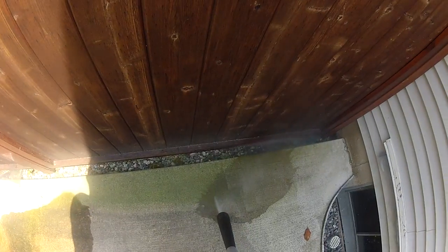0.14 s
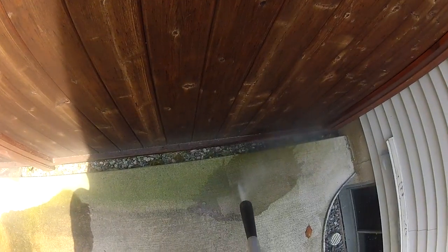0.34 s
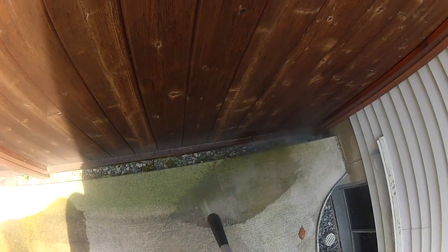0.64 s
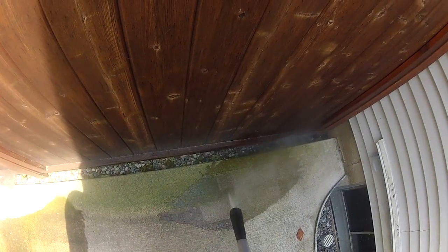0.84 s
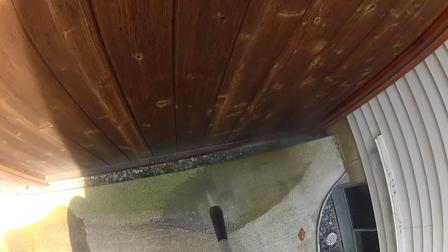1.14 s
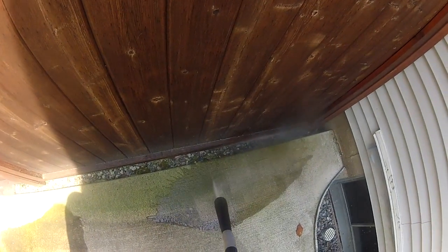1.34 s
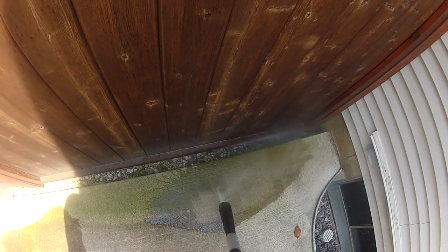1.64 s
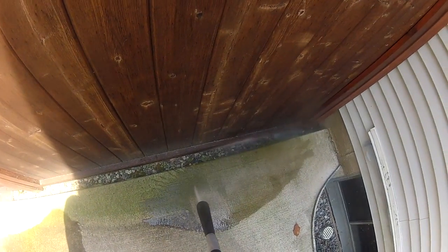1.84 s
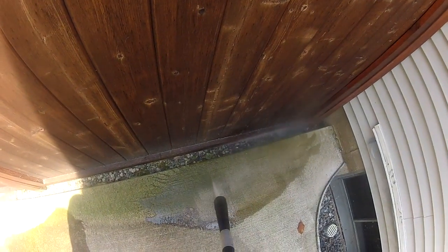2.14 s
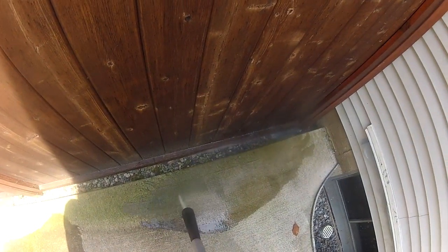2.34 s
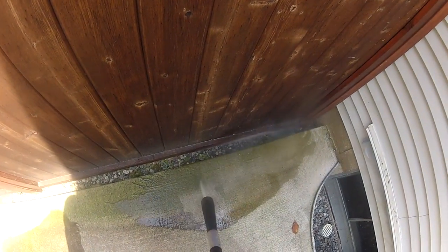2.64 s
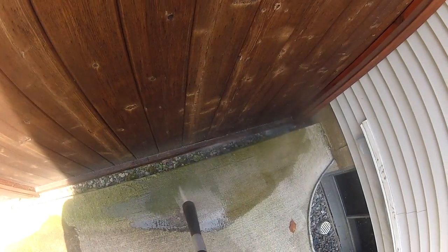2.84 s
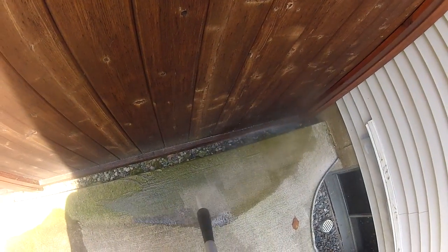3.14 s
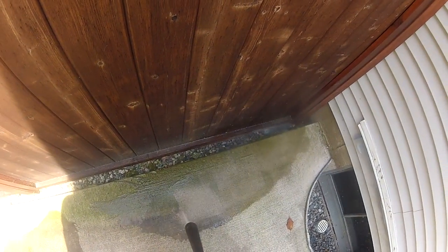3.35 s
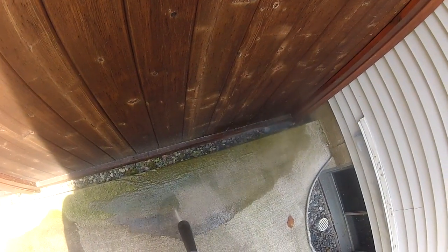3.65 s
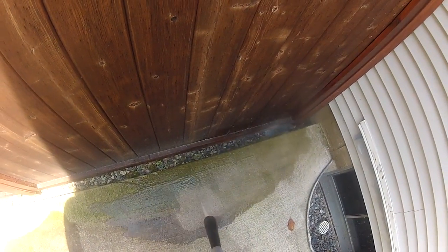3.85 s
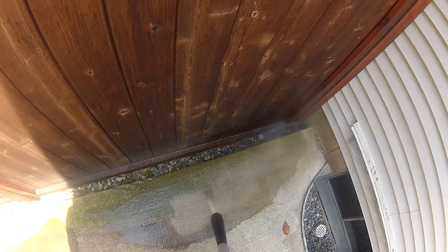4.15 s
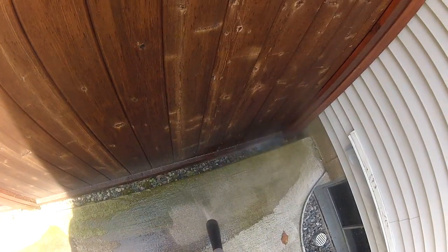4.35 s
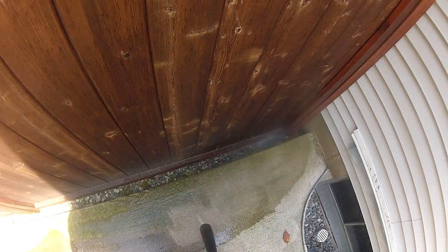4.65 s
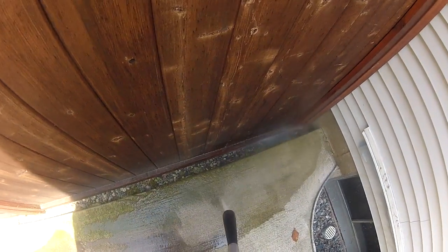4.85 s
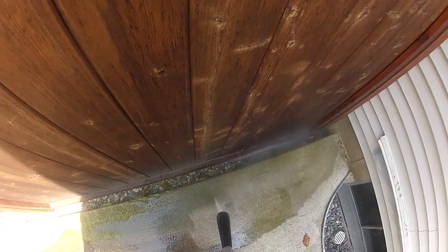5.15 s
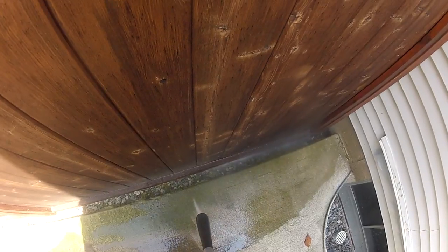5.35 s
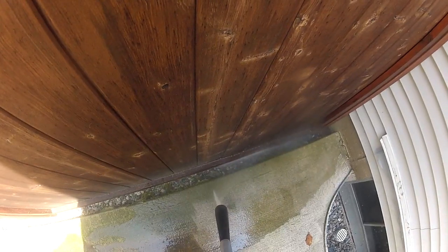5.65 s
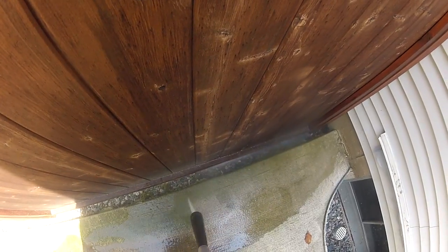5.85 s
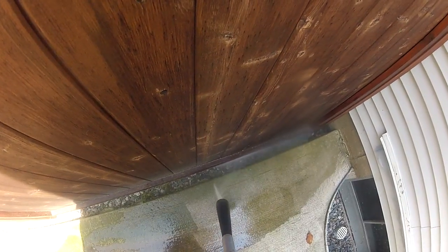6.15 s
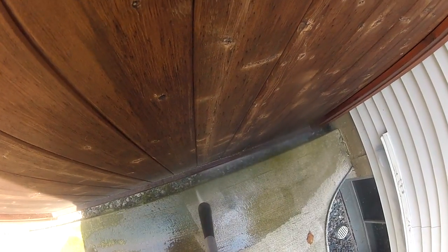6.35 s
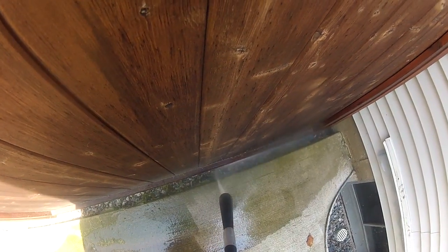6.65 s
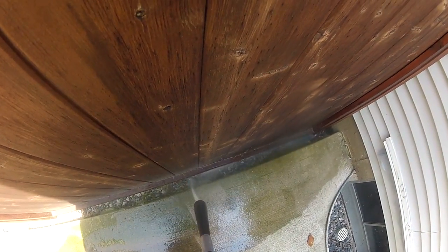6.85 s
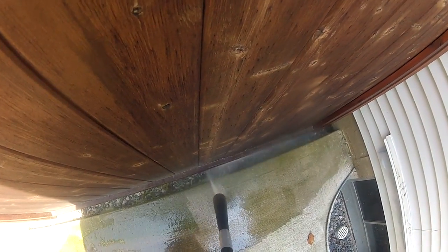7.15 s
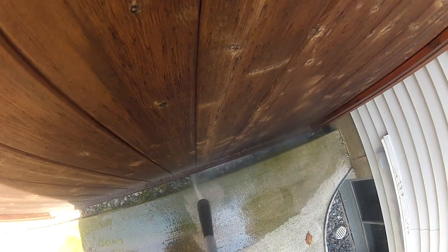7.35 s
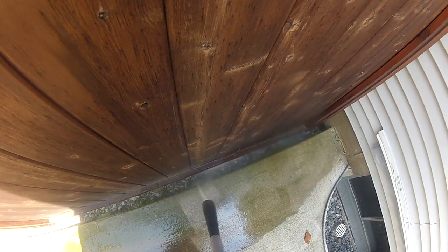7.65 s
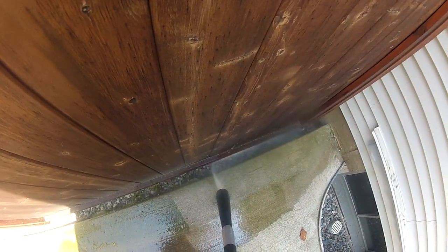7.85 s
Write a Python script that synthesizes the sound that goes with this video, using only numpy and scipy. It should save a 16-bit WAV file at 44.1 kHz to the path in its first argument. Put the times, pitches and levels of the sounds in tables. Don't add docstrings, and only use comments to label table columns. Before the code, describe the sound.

From 0 to 8 seconds a pressure washer jet hisses without pause on concrete, close and bright, with a fine flutter and a faint fast pulse from the pump. Beneath it a one-cylinder engine fires steadily, roughly 27 times a second, as a low blurred putter with rumble and airy exhaust roar, hidden behind a wooden fence. Near 1 second the hiss changes tint slightly as the wearer stands; at about 1.4 a tiny dip passes. Around 3.3 they stoop and the tint shifts again. At 4.1 to 4.5 the tail pipe buzz swells, then a short deeper dip comes at 4.6. From about 5 seconds the engine is in clear view, raspier and more tonal, while its lowest thump softens after 6 and the hiss eases slightly. Close reflections give a hollow, sliding colour; the body-worn microphone sounds coarse, with a gritty, metallic top. It ends still running.

```python
import sys
import numpy as np
from scipy import signal
from scipy.fft import rfft, irfft
from scipy.io import wavfile
from scipy.ndimage import uniform_filter1d, map_coordinates

SR = 44100
rng = np.random.default_rng(int(sys.argv[2]) if len(sys.argv) > 2 else 0)


def to_linear_factor(level_db):
    exponent = np.asarray(level_db, float) / 20
    return 10 ** exponent


def pcm_store(signal):
    levels = np.round(np.clip(np.atleast_2d(signal), -1, 1) * 32767)
    wavfile.write(sys.argv[1], SR, levels.astype(np.int16).T)


N = 352800


def unit(x):
    return x / np.sqrt(np.mean(np.abs(x) ** 2) + 1e-20)


def curves(rows):
    times, *columns = np.transpose(rows)
    return [np.interp(np.arange(N) / SR, times, column) for column in columns]


def wobble(rate):
    knots = rng.standard_normal(int(N * rate / SR) + 4)
    return map_coordinates(knots, [np.arange(N) * rate / SR])


def rush(colour, patchy_db):
    spectrum = signal.stft(rng.standard_normal(N + 1024), nperseg=1024)[2]
    ridges = uniform_filter1d(rng.standard_normal(spectrum.shape), size=3, axis=0)
    drifting = unit(uniform_filter1d(ridges, size=30, axis=1))
    patchy = signal.istft(spectrum * to_linear_factor(patchy_db * drifting), nperseg=1024)[1][:N]
    hz, db = np.transpose(colour)
    log_hz = np.log(np.fft.rfftfreq(N, 1 / SR) + 1)
    gain = to_linear_factor(np.interp(log_hz, np.log(hz), db))
    return unit(irfft(rfft(patchy) * gain, N))


def later(x, ms):
    return map_coordinates(x, [np.arange(N) - ms * SR / 1000], mode="mirror")


def pulses(orders, cycles, clear, unsteady_db, skew=0, glide=0):
    total, power = 0, 0
    for multiple, db, change_db in orders:
        level_db = db + clear * change_db
        phase = skew + glide * (multiple - orders[1][0]) ** 2
        total = total + to_linear_factor(level_db) * np.cos(2 * np.pi * multiple * cycles + phase)
        power = power + to_linear_factor(2 * level_db) / 2
    return total / np.sqrt(power) * to_linear_factor(unsteady_db * wobble(20))


# t/s, firings ahead of the steady rate [cycles]
GOVERNOR = [(0, 0), (1.1, .066), (1.55, .037), (2.85, -.02), (3.5, .033), (4.1, -.017), (4.7, -.008),
            (5.3, -.027), (6.2, .021), (6.6, .022), (6.9, .011), (8, .014)]


def firings():
    firing_hz, first = 27.26, -.401
    ahead, = curves(GOVERNOR)
    return first + firing_hz * np.arange(N) / SR + ahead


# t/s, stance [0 upright, 1 stooped, 2 turning, 3 past the corner, 4 settled]
STANCE = [(0, 1), (.85, 1.06), (1.1, 0), (3.15, 0), (3.35, 1), (4.66, 1.13), (4.93, 2), (5.12, 2.5),
          (5.35, 3), (6.05, 3), (6.65, 4.5), (8, 4)]


def by_stance(values):
    stance, = curves(STANCE)
    return np.interp(stance, np.arange(len(values)), values)


# t/s, thump level/dB, way along the fence [0-1], turn towards the tail pipe [0 none, 1
WALK = [(0, -16.4, .02, .75), (.5, -17, .02, .45), (1.3, -17.1, .18, 0), (1.85, -17.1, .24, 0),
        (2.05, -15.8, .28, 0), (3.25, -16.2, .36, 0), (3.7, -14.1, .33, .25), (4.11, -15.8, .5, .3),
        (4.18, -15.3, .55, 1.12), (4.5, -15.2, .62, 1.05), (4.62, -15, .76, .1), (4.88, -14.7, .84, -.2),
        (5.12, -15.2, 1, 0), (6.1, -17.1, 1, 0), (6.5, -17.5, 1, 0), (6.85, -19, 1, 0), (7.7, -18, 1, 0),
        (8, -19.3, 1, 0)]


def walk():
    thump_db, way, turn = curves(WALK)
    corner_from = .78
    clear = np.clip((way - corner_from) / (1 - corner_from), 0, 1)
    return thump_db, way, turn, clear


# f/Hz, density level/dB [per Hz]
RUMBLE_COLOUR = [(25, -40), (50, -15), (90, -14.5), (150, -6.5), (240, -9), (310, -3.5), (355, -6),
                 (450, -1.5), (600, -5), (800, -50)]
RUMBLE_DB = [-27.2, -26.3, -26.5, -24, -24]


def rumble():
    return to_linear_factor(by_stance(RUMBLE_DB) - 1.5 + .3 * wobble(6)) * rush(RUMBLE_COLOUR, patchy_db=.4)


# f/Hz, density level/dB [per Hz]
ROAR_COLOUR = [(300, -40), (430, 3), (550, -1.5), (660, 5), (780, 1.5), (840, -14.5), (1100, -13),
               (1500, -52)]
AIR_DB = [-23.5, -24.2, -22, -23.2, -24.5]


def air_roar():
    way = walk()[1]
    level_db = by_stance(AIR_DB) - 3.5 * way - 1.5
    puff_db = .095 * np.cos(2 * np.pi * (firings() + .019))
    return to_linear_factor(level_db + puff_db + .9 * wobble(11)) * rush(ROAR_COLOUR, patchy_db=1.4)


def fundamental():
    return to_linear_factor(walk()[0] - 27) * np.cos(2 * np.pi * (firings() + .39))


# multiple of the firing rate, level/dB, change in clear view/dB
CASING = [(9, -4, 3), (10, 0, -12), (24, -9, -3), (28, -8, 6)]


def casing():
    _, way, _, clear = walk()
    return to_linear_factor(-25.8 - 13.8 * way) * pulses(CASING, firings() + .027, clear, unsteady_db=.3)


# multiple of the firing rate, level/dB, change in clear view/dB
COVER = [(11, 0, 1), (12, -3, 1)]


def cover():
    thump_db, way, _, clear = walk()
    level_db = thump_db - 10.3 - 6 * way + 2.5 * clear
    return to_linear_factor(level_db) * pulses(COVER, firings() + .008, clear, unsteady_db=.3)


# multiple of the firing rate, level/dB, change in clear view/dB
FRAME = [(13, -17, 4), (14, 0, 0), (15, -11, 0)]


def frame():
    _, _, turn, clear = walk()
    level_db = -28.5 + 6.2 * clear - 8 * turn
    return to_linear_factor(level_db) * pulses(FRAME, firings() + .005, clear, unsteady_db=.3)


# multiple of the firing rate, level/dB, change in clear view/dB
PIPE = [(16, -2, 2), (17, -3, 1), (18, 0, 0), (19, -3, -3), (20, -5.5, -4.5), (21, -14, -3)]
# f/Hz, density level/dB [per Hz]
PIPE_AIR = [(320, -34), (375, -11), (450, -5), (510, -2), (560, -14), (700, -42)]


def tail_pipe():
    _, _, turn, clear = walk()
    level_db = -27.7 + 11.6 * clear + 7.5 * turn
    lead = .285 + .015 * clear
    glide = .38 + (.11 - .38) * clear
    burst = pulses(PIPE, firings() + lead, clear, unsteady_db=.3, glide=glide)
    return to_linear_factor(level_db) * burst + to_linear_factor(level_db - 17.7) * rush(PIPE_AIR, patchy_db=.8)


# multiple of the firing rate, level/dB, change in clear view/dB
MUFFLER = [(2, -8.5, -1), (3, -4, 0), (4, -3, 1), (5, 1.5, 1.5), (6, 1.5, 0.5), (7, -10, 3), (8, -11.5, 3)]


def thump():
    thump_db, _, _, clear = walk()
    return to_linear_factor(thump_db + .1) * pulses(MUFFLER, firings() - .017, clear, unsteady_db=.3, skew=.48)


# f/Hz, density level/dB [per Hz]
JET_COLOUR = [(500, -33), (800, -9.5), (1100, -5.5), (1500, -4.5), (1900, -5.5), (2200, 1), (2600, -3),
              (3000, 1.5), (3500, -2), (4100, -5), (4700, -4), (5300, -9), (5600, -15), (5950, -19)]
HISS_DB = [-15, -15, -15.5, -15.4, -17]
# delay [ms], share of the direct sound [ratio]
GROUND = [(0.3907, .62), (0.414, 0.56), (0.36, 0.57), (0.4, 0.2), (0.423, 0.29)]
FENCE = [(.21, 0.28), (.19, 0.13), (0.24, .35), (0.18, 0.55), (0.14, 0.27)]
WALL = [(0.55, .12), (0.542, 0.38), (0.62, 0.06), (0.578, 0.2), (0.575, 0.22)]
STEP = [(1.27, 0.074), (0.926, 0.077), (1.1, 0.082), (.72, 0.061), (0.832, 0.1)]
SIDING = [(1.474, 0.082), (1.575, 0.027), (1.72, 0.093), (1.54, 0.09), (1.78, 0.084)]


def jet():
    cycles = firings()
    pump_db = .3 * np.cos(4 * np.pi * (cycles + .03)) + .43 * np.cos(2 * np.pi * (cycles + .059))
    unsteady_db = .39 * wobble(7.9) + .47 * wobble(40)
    hiss = to_linear_factor(pump_db + unsteady_db) * rush(JET_COLOUR, patchy_db=1.5)
    echoes = 0
    for surface in (GROUND, FENCE, WALL, STEP, SIDING):
        ms, share = np.transpose(surface)
        echoes = echoes + by_stance(share) * later(hiss, by_stance(ms))
    scattered = .18 * rush(JET_COLOUR, patchy_db=3.5)
    return to_linear_factor(by_stance(HISS_DB) - 1.5) * (hiss + echoes + scattered)


# t/s, level/dB, half length [s]
SHADOWS = [
    (1.395, -0.5, 0.039),
    (4.592, -1.5, 0.054),
]


def shadows():
    t = np.arange(N) / SR
    return to_linear_factor(sum(db * np.exp(-((t - s) / half_s) ** 2) for s, db, half_s in SHADOWS))


def scene():
    roar = rumble() + air_roar()
    engine = fundamental() + casing() + cover() + frame() + tail_pipe() + thump()
    return (shadows() * (roar + engine + jet()))[None]


def low_pass(x):
    return signal.sosfilt(signal.butter(12, 16610, fs=SR, output="sos"), x)


def record(dry):
    slow_hz, hold, top_hz = 12000, 4, 15400
    slow = signal.resample(dry, N * slow_hz // SR, axis=1)
    slow = slow / (1 + np.abs(slow / .985) ** 16) ** (1 / 16)
    held = signal.resample(np.repeat(slow, hold, axis=1), N, axis=1)
    mix = irfft(rfft(held) * (np.fft.rfftfreq(N, 1 / SR) < top_hz), N)
    return low_pass(mix)


dry = scene()
out = record(dry)
pcm_store(out)
```